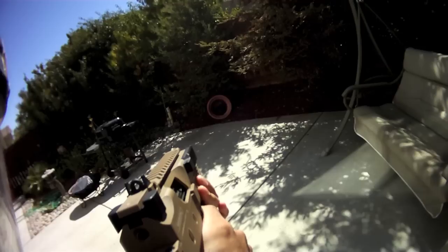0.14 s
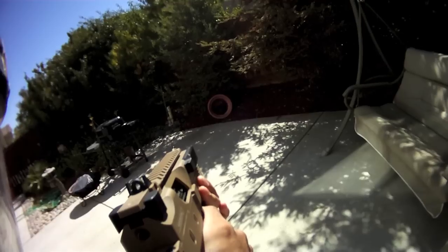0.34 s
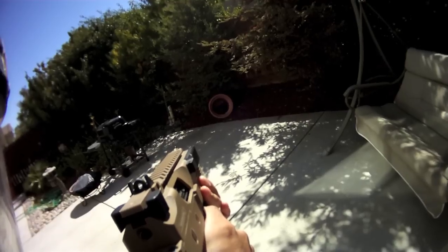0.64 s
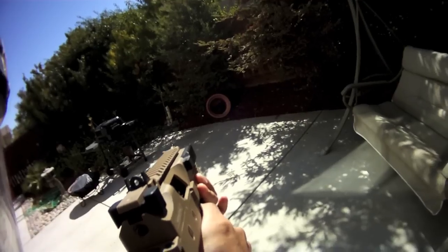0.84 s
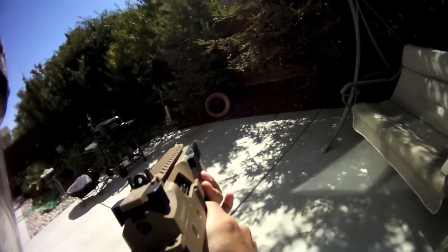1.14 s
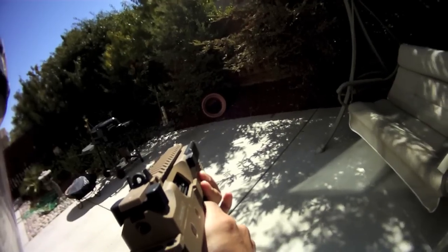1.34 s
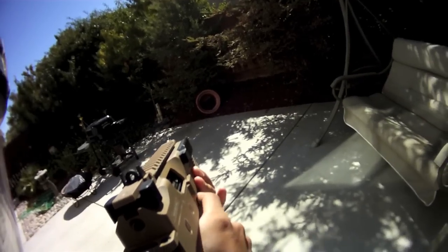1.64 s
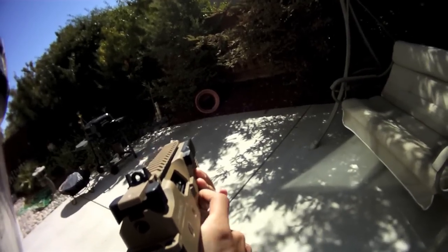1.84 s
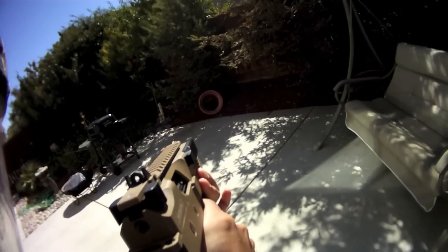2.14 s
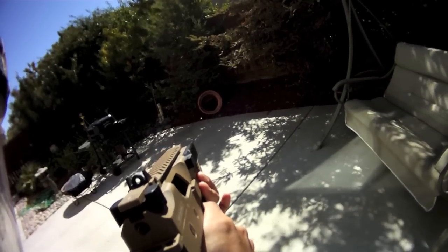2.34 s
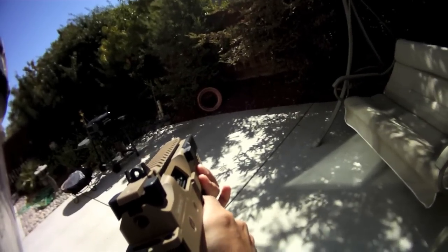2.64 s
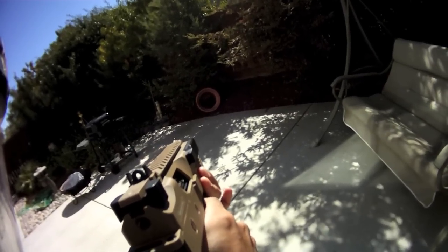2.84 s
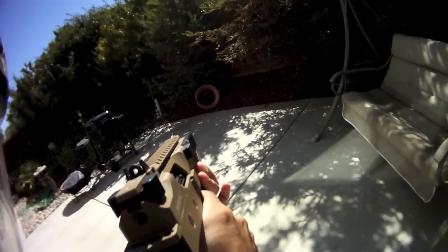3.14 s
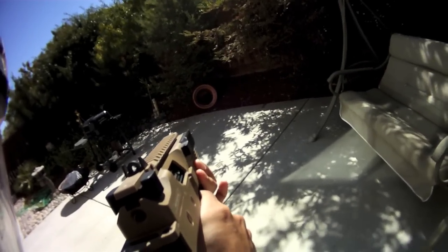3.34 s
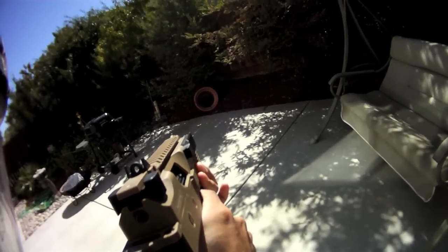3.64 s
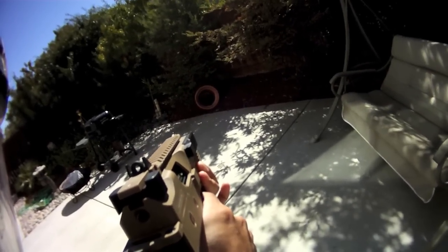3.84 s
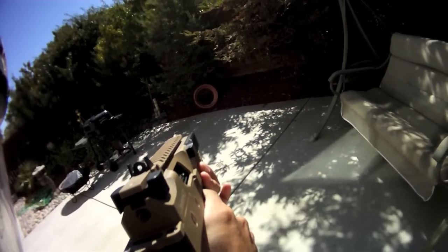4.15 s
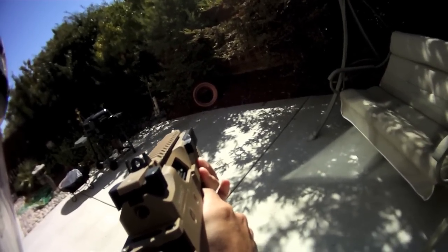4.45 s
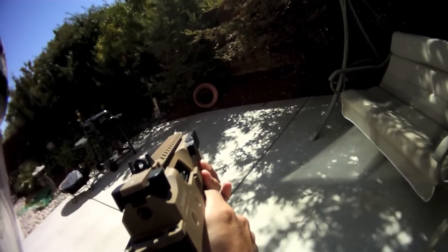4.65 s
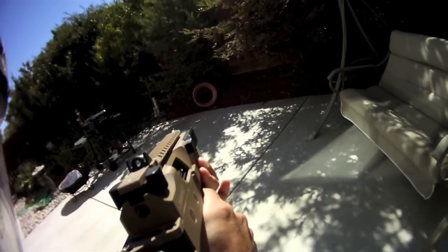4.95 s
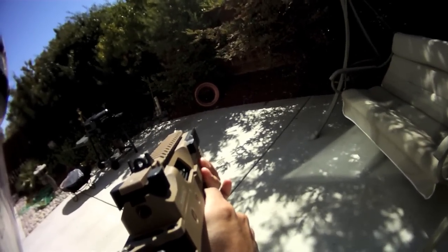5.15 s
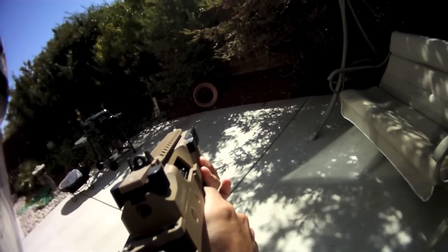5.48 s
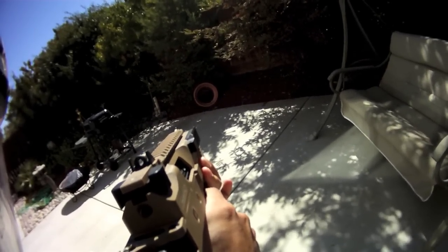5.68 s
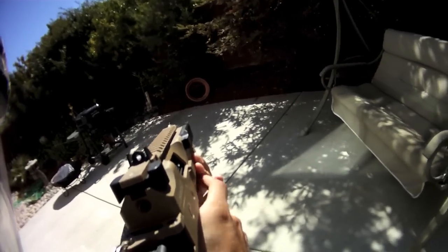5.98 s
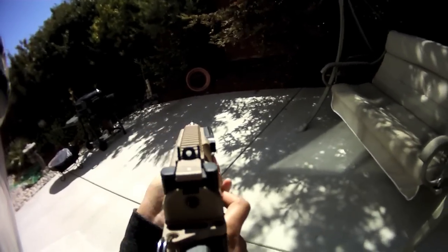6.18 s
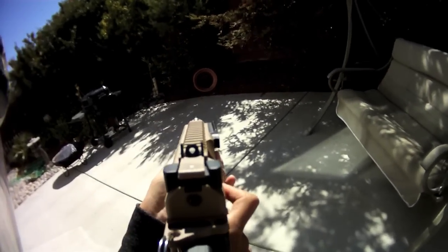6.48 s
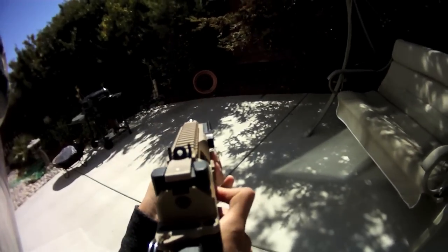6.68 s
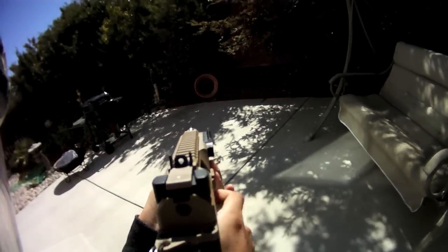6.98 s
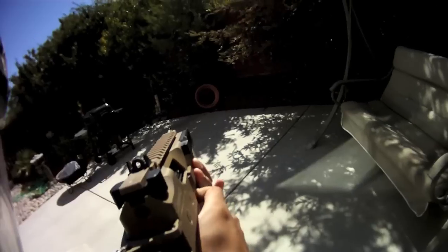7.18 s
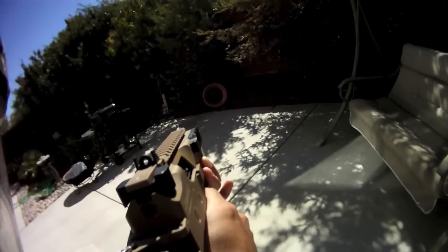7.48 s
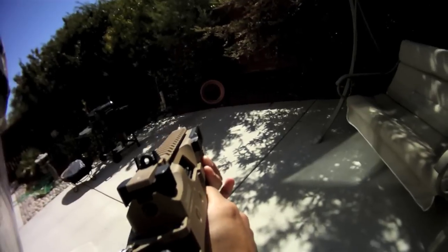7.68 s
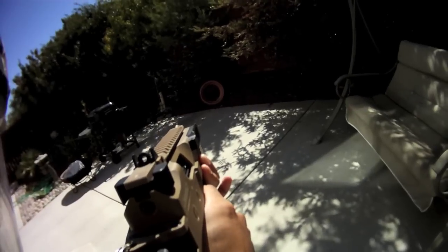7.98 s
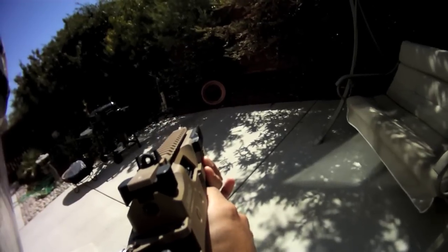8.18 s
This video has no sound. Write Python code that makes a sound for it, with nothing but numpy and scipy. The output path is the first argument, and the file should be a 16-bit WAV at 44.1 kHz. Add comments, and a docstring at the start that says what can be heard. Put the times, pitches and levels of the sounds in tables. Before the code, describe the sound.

A gas airsoft gun fires eight short, sharp bursts close by in a quiet backyard, then a lever snaps as it is handled.

```python
"""Airsoft bursts in a backyard.

A gas-blowback airsoft gun fires eight short bursts close by, in a paved, fenced yard. Each round is a
valve squeal, a thump of gas and the clatter of the bolt flying back and slamming home; the pellet
strikes across the yard, which rings on. The trigger ticks between bursts; afterwards the gun is
shifted in the hands and a lever snaps."""
import sys
import numpy as np
from scipy import signal
from scipy.fft import rfft, irfft
from scipy.io import wavfile
from scipy.ndimage import uniform_filter1d, minimum_filter1d

SR = 44100
rng = np.random.default_rng(int(sys.argv[2]) if len(sys.argv) > 2 else 0)


def output_pcm(signal):
    """Save a mono or channel-first signal as 16-bit PCM at the path in sys.argv[1].

    Samples are clipped to [-1, 1] before scaling.
    """
    pcm = np.clip(np.atleast_2d(signal).T, -1, 1) * 32767
    wavfile.write(sys.argv[1], SR, np.round(pcm).astype(np.int16))


N = 366912
TIME = np.arange(N) / SR


def from_db(db):
    """Decibels to gain."""
    return 10 ** (np.asarray(db) / 20)


def unit_rms(x):
    """Scale to rms 1."""
    return x / np.sqrt(np.mean(x ** 2) + 1e-20)


def at_hz(points, hz):
    """Read a table on a log-frequency axis."""
    freqs_hz, values = np.transpose(points)
    return np.interp(np.log(np.maximum(hz, 1)), np.log(freqs_hz), values)


def colour(x, spectrum, size=4096):
    """Minimum-phase filter of the given shape; white noise keeps its power."""
    gain = unit_rms(from_db(at_hz(spectrum, np.arange(size // 2 + 1) * SR / size)))
    cepstrum = irfft(np.log(gain))
    cepstrum[1:size // 2] *= 2
    cepstrum[size // 2 + 1:] = 0
    response = irfft(np.exp(rfft(cepstrum)))
    return signal.fftconvolve(x, response)[:len(x)]


def resonance(x, hz, width_hz):
    """Two-pole band-pass, peak gain 1."""
    r = np.exp(-np.pi * width_hz / SR)
    b = np.array([1, 0, -1]) * (1 - r * r) / 2
    a = [1, -2 * r * np.cos(2 * np.pi * hz / SR), r * r]
    return signal.lfilter(b, a, x + 1e-18)


def narrow_noise(size, hz, width_hz):
    """Noise through the same resonance twice, rms 1."""
    once = resonance(rng.standard_normal(size), hz, width_hz)
    return unit_rms(resonance(once, hz, width_hz))


def add(out, time_s, sound):
    """Mix a sound in at time_s."""
    at = max(round(time_s * SR), 0)
    out[at:at + len(sound)] += sound[:N - at]


def contact(rise_s, decay_s, grain_db=2.5, size=6000):
    """A spray of tiny uneven impacts that swells quickly and dies away."""
    t = TIME[:size]
    roughness = unit_rms(uniform_filter1d(rng.standard_normal(size), size=24))
    spray = unit_rms(from_db(grain_db * roughness) * rng.standard_normal(size))
    return spray * (1 - np.exp(-t / rise_s)) * np.exp(-t / decay_s)


def clicks(rows, spectrum, decay_s):
    """Small, dry contacts of hard parts."""
    out = np.zeros(N)
    for time_s, db in rows:
        add(out, time_s, from_db(db) * contact(rise_s=.0001, decay_s=decay_s))
    return colour(out, spectrum)


# outdoor air: (frequency [Hz], relative level [dB])
AIR_SPECTRUM = [(15, -38), (25, -7), (70, -1), (97, -6), (130, -5), (317, -7.5), (363, 0.5), (591, -3.5),
                (1040, -10), (1440, -9.5), (3250, -13.5), (11300, -19.5), (14800, -21.5), (16000, -37)]


def background(air_db=-67, drone_hz=111, drone_db=-72, whine_hz=11089, whine_db=-82):
    """Quiet outdoor air, a brief far drone and a thin electronic whine."""
    air = colour(rng.standard_normal(N), AIR_SPECTRUM)
    drone = narrow_noise(N, drone_hz, width_hz=9)
    swell = np.interp(TIME, [1.03, 1.18, 1.77, 1.9], [0, 1, 1, 0])
    whine = unit_rms(np.sin(2 * np.pi * whine_hz * TIME))
    return from_db(air_db) * air + from_db(drone_db) * swell * drone + from_db(whine_db) * whine


# yard echo: (frequency [Hz], relative level [dB])
YARD_SPECTRUM = [(30, -14), (90, -8.5), (135, 6), (185, 7), (300, -4), (450, -4), (900, -2.5), (1700, -3),
                 (2500, 0), (3100, 0), (4000, -7.5), (5000, -5), (9000, -1), (16000, 0)]
# ring time of the far scatter: (frequency [Hz], T60 [s])
YARD_T60 = [(100, 0.4), (400, 0.55), (1200, 0.44), (2300, 0.37), (3000, 0.72), (3800, 0.4), (4600, .42),
            (8000, 0.3), (14000, 0.26)]


def yard(x, near_db=-15, near_t60_s=.092, far_db=-20, far_rise_s=.018, delay_s=.01, size=44100):
    """Paving, house wall and fence throw back a quick scatter; trees and farther walls a long one."""
    t, tail = TIME[:size], 0
    edges_hz = np.geomspace(30, 18000, num=22)
    for low, high in zip(edges_hz, edges_hz[1:]):
        band_pass = signal.butter(2, [low, high], "band", fs=SR, output="sos")
        band = signal.sosfilt(band_pass, rng.standard_normal(size))
        t60_s = at_hz(YARD_T60, np.sqrt(low * high))
        tail = tail + band * from_db(-60 * t / t60_s)
    far = unit_rms(tail * (1 - np.exp(-t / far_rise_s)))
    spikes = rng.standard_normal(size) ** 3
    near = unit_rms(spikes * from_db(-60 * t / near_t60_s))
    response = colour(from_db(near_db) * near + from_db(far_db) * far, YARD_SPECTRUM) / np.sqrt(size)
    out = np.zeros(N)
    add(out, delay_s, signal.fftconvolve(x, response)[:N])
    return out


# discrete reflections: (delay [s], gain [dB])
SLAP_ECHOES = [(.0098, -10), (.029, -16.5), (0.0617, -19), (.0735, -26)]


def slaps(x):
    """Single echoes off the paving, the fence and farther walls."""
    out = np.zeros(N)
    for delay_s, db in SLAP_ECHOES:
        add(out, delay_s, from_db(db) * x)
    return out


# low rings after some bursts: (time [s], level [dB], frequency [Hz], decay [s])
HOLLOW_RINGS = [(0.887, -44, 164, 0.023), (2.451, -25.5, 197.3, 0.012), (3.105, -47, 179, 0.034),
                (3.62, -40.5, 215.7, 0.057)]


def hollow_rings(width_hz=60, size=16000):
    """Something hollow is shaken into a short, low ring."""
    out = np.zeros(N)
    for time_s, db, hz, decay_s in HOLLOW_RINGS:
        ring = narrow_noise(size, hz, width_hz) * np.exp(-TIME[:size] / decay_s)
        add(out, time_s, from_db(db) * ring)
    return out


# hands on the gun: (time [s], level [dB], low-pass corner [Hz])
HAND_KNOCKS = [(0.49, -63, 160.2), (6.231, -59, 89.5), (6.34, -65, 90.1), (6.934, -56.5, 170),
               (6.988, -62.5, 201), (7.1197, -37.5, 1180), (7.125, -43.5, 790), (7.216, -50.5, 3010),
               (7.351, -59, 130.4)]


def handling(rise_s=.0009, base_decay_s=.0028, decay_cycles=1.1):
    """Palms and fingers knock on the stock; soft contacts are dull and last longer."""
    out = np.zeros(N)
    for time_s, db, corner_hz in HAND_KNOCKS:
        low_pass = signal.butter(2, corner_hz, fs=SR, output="sos")
        knock = signal.sosfilt(low_pass, contact(rise_s, base_decay_s + decay_cycles / corner_hz))
        makeup_gain = np.sqrt(SR / 2 / corner_hz)
        add(out, time_s, from_db(db) * makeup_gain * knock)
    return out


# lever contacts: (time [s], level [dB])
LEVER_SNAPS = [(6.6015, -17.5), (6.6033, -29.5), (6.6287, -44)]
# lever snap: (frequency [Hz], relative level [dB])
LEVER_SPECTRUM = [(100, -48), (350, -20), (560, 2.5), (720, 2.5), (1150, -7), (1850, -5), (2700, -7.5),
                  (3400, -1.5), (4100, -1), (4700, -13), (6000, -4), (8900, -16), (12500, -8), (16000, -32)]


def lever():
    """A lever snaps over in three quick metal contacts."""
    return clicks(LEVER_SNAPS, LEVER_SPECTRUM, decay_s=.0016)


# trigger and sear ticks: (time [s], ping level [dB])
TRIGGER_TICKS = [(0.0663, -53), (0.3883, -40), (2.2513, -33.5), (2.7994, -37), (3.5034, -37.5),
                 (3.9758, -31.5), (4.543, -36), (5.062, -38), (5.6875, -30.5), (7.0107, -42), (7.428, -59)]
# spring ping: (frequency [Hz], relative level [dB])
PING_SPECTRUM = [(100, -30.5), (2000, -23.5), (4500, -16), (5400, 4), (7500, -6), (10000, -16),
                 (16000, -19.5)]
# body knock: (frequency [Hz], relative level [dB])
KNOCK_SPECTRUM = [(100, -23), (900, -11), (1800, -2.5), (2800, -4), (3900, 1.5), (4800, -12),
                  (16000, -19.5)]


def trigger(knock_offset_db=-36, knock_db_per_db=.16):
    """Each tick is a thin ping of the spring over a knock in the body."""
    pings = clicks(TRIGGER_TICKS, PING_SPECTRUM, decay_s=.0013)
    knocks = [(time_s, knock_offset_db + knock_db_per_db * db) for time_s, db in TRIGGER_TICKS]
    return pings + clicks(knocks, KNOCK_SPECTRUM, decay_s=.00073)


# trigger pulls: (first thump [s], rounds [count], first cycle [s], squeal pitch [Hz],
# slam gain [dB], pellet level [dB])
TRIGGER_PULLS = [(0.7186, 4, 0.045, 3150, 0, -34), (2.309, 3, 0.051, 3135, 1.5, -23.5),
                 (2.9479, 3, .0474, 3290, 1, -21.5), (3.5483, 2, .0510, 3115, 2, -11.5),
                 (4.0154, 2, 0.048, 3060, -1, -30), (4.5802, 2, .0459, 3055, 0, -23.5),
                 (5.0967, 3, 0.044, 3315, 0, -28), (5.7241, 3, .0468, 3160, 1, -28)]


def rounds(cycle_s=.045, slam_lead_s=.0152):
    """The bolt cycles while the trigger is held, settling to a steady rate after the first round."""
    rows = []
    for start_s, count, first_cycle_s, squeal_hz, slam_db, pellet_db in TRIGGER_PULLS:
        ends_s = start_s + first_cycle_s + cycle_s * np.arange(round(count))
        for thump_s, end_s in zip([start_s, *ends_s], ends_s):
            rows.append((thump_s, end_s - slam_lead_s, squeal_hz, slam_db, pellet_db))
    return np.transpose(rows)


# pellet impact: (frequency [Hz], relative level [dB])
PELLET_SPECTRUM = [(100, -19), (220, -2), (450, -10), (780, -5), (1100, -6), (1450, -3), (2200, -3.5),
                   (3100, 8), (4700, -4.5), (7000, -21), (15000, -22)]
# hits of a ricocheting pellet: (time [s], level [dB])
RICOCHET_HITS = [(3.686, -6), (3.711, -14)]


def pellets(thumps_s, levels_db, flight_s=.062):
    """Every pellet strikes across the yard after the same flight; one ricochets."""
    hits = [*zip(thumps_s + flight_s, levels_db), *RICOCHET_HITS]
    return clicks(hits, PELLET_SPECTRUM, decay_s=.00021)


def muzzle(thumps_s, level_db=-9, hz=470, width_s=.0013, size=800):
    """Gas leaves the barrel as one low pressure swing."""
    out = np.zeros(N)
    t = TIME[:size] - TIME[size // 2]
    swing = np.cos(2 * np.pi * hz * t) * np.exp(-(t / width_s) ** 2)
    for thump_s in thumps_s:
        add(out, thump_s + t[0], swing)
    return from_db(level_db) * out


def valve(thumps_s, pitches_hz, lead_s=.0072, length_s=.0046, fall=.18, waver=.093, size=600):
    """Gas squeals through the valve, sinking in pitch as the pressure drops."""
    out = np.zeros(N)
    progress = np.clip(TIME[:size] / length_s, 0, 1)
    envelope = np.abs(np.sin(np.pi * progress)) ** .6
    for thump_s, centre_hz in zip(thumps_s, pitches_hz):
        wobble = unit_rms(uniform_filter1d(rng.standard_normal(size), size=20))
        hz = centre_hz * (1 + fall * (.5 - progress) + waver * wobble)
        add(out, thump_s - lead_s, envelope * np.sin(2 * np.pi * np.cumsum(hz) / SR))
    return out


def stroke(contacts, times_s, gains, repeat_share):
    """The same parts meet in every round, so each contact partly repeats itself."""
    out = np.zeros(N)
    for offset_s, db, rise_s, decay_s in contacts:
        repeated = np.sqrt(repeat_share) * contact(rise_s, decay_s)
        for time_s, gain in zip(times_s, gains):
            fresh = np.sqrt(1 - repeat_share) * contact(rise_s, decay_s)
            add(out, time_s + offset_s, gain * from_db(db) * (repeated + fresh))
    return out


# hammer falls, valve opens, bolt unlocks, gas vents:
# (time from thump [s], level [dB], rise [s], decay [s])
FIRING_CONTACTS = [(-.0102, -21.5, .0002, .004), (-.0074, -2.5, .0002, 0.0018), (-.0011, -5, .0002, .0012),
                   (.0012, -7, 0.00019, .0016)]
# bolt hits the rear stop: (time from stop [s], level [dB], rise [s], decay [s])
STOP_CONTACTS = [(.0004, -4.5, .0003, 0.0034), (.0055, -18.5, 0.00045, 0.0043)]
# next pellet is stripped, bolt closes, bolt bounces:
# (time from slam [s], relative level [dB], rise [s], decay [s])
RETURN_CONTACTS = [(-.0085, -22, .001, 0.0064), (-.001, -9.5, 0.00073, 0.0041), (.0028, -14.5, .0012, .007)]
# firing stroke and rear stop: (frequency [Hz], relative level [dB])
FIRING_SPECTRUM = [(30, -31.5), (110, -22.5), (300, -15.5), (580, -8), (830, -11.5), (1080, -12),
                   (1700, -1), (2500, -4.5), (3300, -3.5), (4200, -1), (4700, -6.5), (6700, -5),
                   (8500, -11), (16000, -15.5)]
# return stroke: (frequency [Hz], relative level [dB])
RETURN_SPECTRUM = [(30, -31), (120, -28), (280, -7.5), (600, -9), (1100, -17), (1700, -3), (2700, -1.5),
                   (3800, 2.5), (4700, -11), (5500, 1), (7000, -6.5), (9500, -6.5), (15000, -20.5)]
# receiver resonances: (frequency [Hz], width [Hz], added gain [ratio])
RECEIVER_MODES = [(520, 70, 0.68), (845, 89, 0.8), (1530, 70, .4), (1875, 25, 0.86), (2027, 32, 0.55),
                  (2443, 130, 0.9), (4040, 320, 0.6), (5200, 85, 0.47), (6950, 88, .5)]


def bolt(thumps_s, slams_s, slams_db, stop_delay_s=.0033):
    """The bolt is blown back to its stop and slams home; each contact rings in the receiver."""
    unity = np.ones(len(thumps_s))
    firing = stroke(FIRING_CONTACTS, thumps_s, unity, repeat_share=.74)
    rear_stop = stroke(STOP_CONTACTS, thumps_s + stop_delay_s, unity, repeat_share=.51)
    slam = stroke(RETURN_CONTACTS, slams_s, from_db(slams_db), repeat_share=.085)
    body = colour(firing + rear_stop, FIRING_SPECTRUM) + colour(slam, RETURN_SPECTRUM)
    return body + sum(gain * resonance(body, hz, width_hz) for hz, width_hz, gain in RECEIVER_MODES)


def scene(squeal_send_db=-4.5, small_send_db=-8):
    """The shots fill the yard; the small sounds stay close."""
    thumps_s, slams_s, squeals_hz, slams_db, pellets_db = rounds()
    squeal = valve(thumps_s, squeals_hz)
    shots = bolt(thumps_s, slams_s, slams_db) + muzzle(thumps_s) + pellets(thumps_s, pellets_db)
    small = trigger() + lever() + handling()
    send = shots + from_db(squeal_send_db) * squeal + from_db(small_send_db) * small
    echo = slaps(squeal) + yard(send)
    return (shots + squeal + small + hollow_rings() + echo + background())[None]


def record(dry, ceiling=.78, window_samples=13, cutoff_hz=15600):
    """A very fast limiter flattens the loudest cracks; the top treble is cut."""
    low_pass = signal.butter(12, cutoff_hz, fs=SR, output="sos")
    heard = signal.sosfiltfilt(low_pass, dry)
    gain = ceiling / np.maximum(np.abs(heard), ceiling)
    smooth_gain = uniform_filter1d(minimum_filter1d(gain, window_samples), window_samples)
    return signal.sosfiltfilt(low_pass, heard * smooth_gain)


dry = scene()
out = record(dry)
output_pcm(out)
```